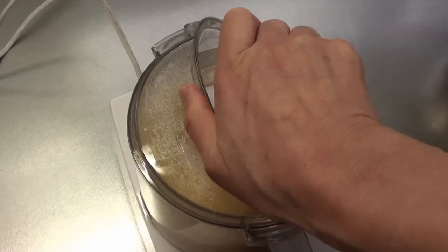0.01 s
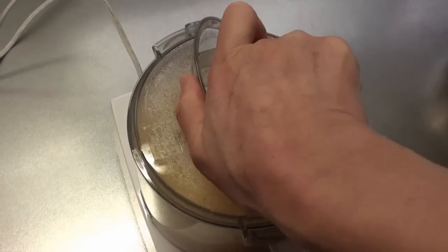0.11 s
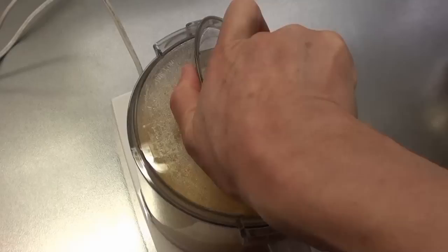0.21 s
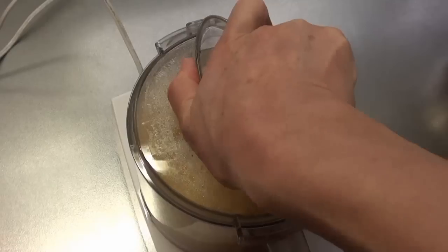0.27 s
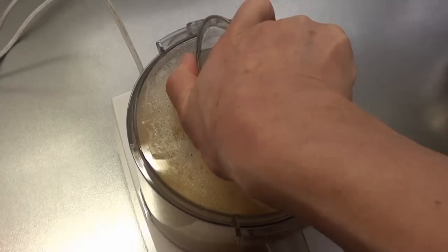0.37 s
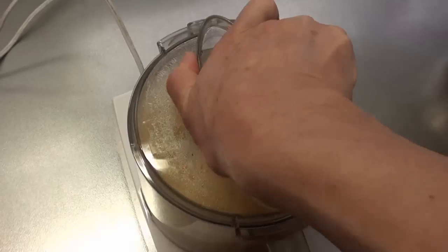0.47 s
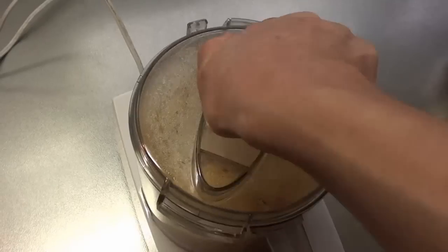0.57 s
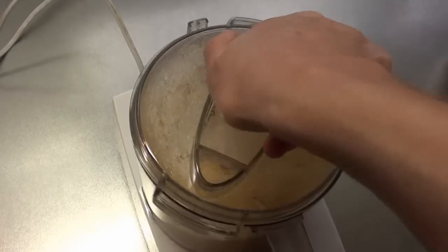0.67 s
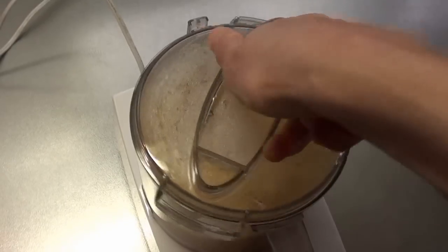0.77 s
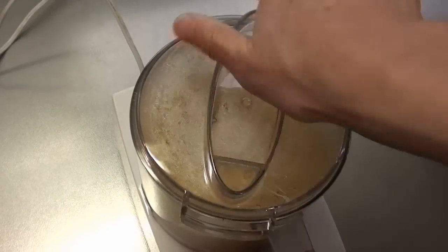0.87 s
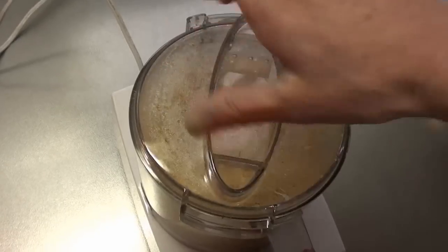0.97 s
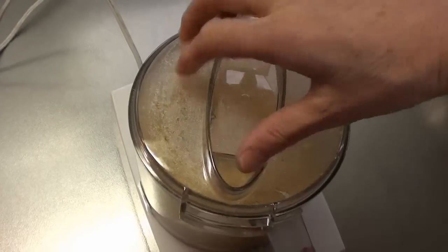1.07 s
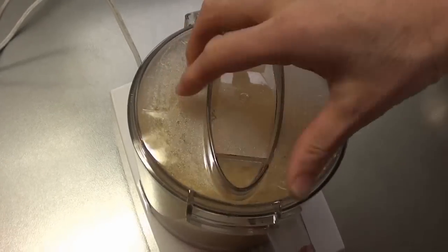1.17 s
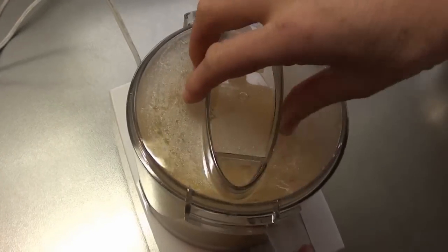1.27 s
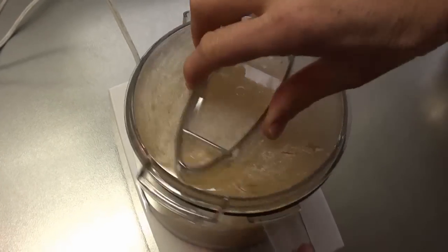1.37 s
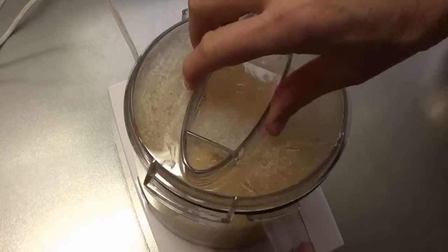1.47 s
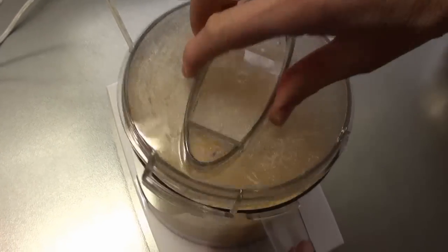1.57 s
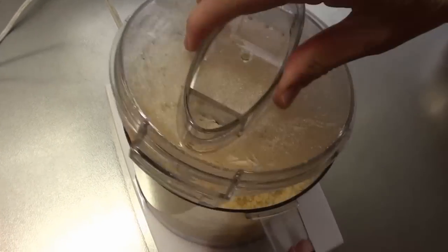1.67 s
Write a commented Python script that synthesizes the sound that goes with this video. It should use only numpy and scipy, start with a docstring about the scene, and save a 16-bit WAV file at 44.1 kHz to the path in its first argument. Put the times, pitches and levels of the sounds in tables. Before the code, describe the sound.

A plastic food processor lid is twisted on its bowl, close up in a small, briefly echoing kitchen. A short rub and light knocks open; latch tabs snap and squeak at about 0.25-0.4 and again at 0.6 seconds. Hard hollow clacks cluster near 0.88, then a quieter gap. Strong knocks land at 1.2 and 1.34, thinning to small taps and rubs by 1.67 over quiet hum and hiss.

```python
"""A hand twists the plastic lid of a food processor bowl to and fro in a small kitchen, over quiet hum and hiss.
It opens on a rub of rim on rim and faint knocks; from a quarter second the latch tabs snap and squeak in two bursts.
Harder knocks follow, then more in the second half, thinning to small ones with short rubs until background is left.
Knocks and snaps are decaying modes plus noise cracks, squeaks are unsteady harmonics, rubs are dense grains;
the short room answers with decaying noise."""
import sys
import numpy as np
from scipy import signal
from scipy.fft import rfft, irfft
from scipy.io import wavfile

SR = 44100
rng = np.random.default_rng(int(sys.argv[2]) if len(sys.argv) > 2 else 0)


def gain_from_decibels(decibels):
    """Convert decibel values to linear amplitude factors."""
    exponent = np.asarray(decibels, float) / 20
    return 10 ** exponent


def transcribe(u):
    """Save the signal u as a 16-bit wav file named by the first command-line argument.

    u: samples, shape (n,) or (channels, n), limited to [-1, 1]; the rate is SR.
    q: integer samples, one column per channel.
    """
    v = np.clip(np.atleast_2d(u).T, -1, 1)
    q = np.round(v * 32767).astype(np.int16)
    wavfile.write(sys.argv[1], SR, q)


N = 77175
LEFT_RIGHT = np.array([[1], [-1]])


def at_hz(points, hz):
    """Straight lines on a log-frequency axis."""
    table = np.array(points)
    return np.interp(np.log(hz + 1e-9), np.log(table[:, 0]), table[:, 1])


def rms_one(x):
    """Scale to unit rms."""
    return x / np.sqrt(np.mean(x ** 2) + 1e-20)


def band(x, low_hz, high_hz):
    """Causal band-pass."""
    return signal.sosfilt(signal.butter(2, [low_hz, high_hz], "band", fs=SR, output="sos"), x)


def drift(hz):
    """Noise through two equal one-pole low-passes: a slow random wander of unit rms."""
    r = np.exp(-2 * np.pi * hz / SR)
    settle = 4000  # samples
    noise = rng.standard_normal(N + settle)
    return rms_one(signal.lfilter([1], [1, -2 * r, r * r], noise)[settle:])


# Onset of a blow: time constant in seconds for each of the four bands, low to high.
RISE_S = [0.006, 0.0004, 0.00013, 0.00021]


def blows(table, modes, bands_hz, crack_db, crack_t60, trim_db):
    """Each blow strikes every mode with its own strength, adds a noise crack, and is levelled band by band."""
    spread_db, spread_pitch = 2.0, 0.015  # blow-to-blow spread of mode level, and of pitch as a share
    out, t = np.zeros(N + SR), np.arange(SR // 5) / SR
    mode_hz, mode_db, t60 = np.transpose(modes)
    decay = gain_from_decibels(-60 * np.outer(1 / t60, t))
    for start, knock, boom, clack, tick in table:
        pitch_chance, level_chance = rng.standard_normal((2, len(mode_hz)))
        noise = rng.standard_normal(len(t))
        turns = np.outer(mode_hz * (1 + spread_pitch * pitch_chance), t)
        strength = gain_from_decibels(mode_db + spread_db * level_chance)
        rings = strength @ (np.sin(2 * np.pi * turns) * decay)
        i = int(start * SR)
        for k, band_db in enumerate([boom, knock, clack, tick]):
            low, high = bands_hz[k:k + 2]
            # white noise raised so that its share inside the band has unit power
            crack = noise * np.sqrt(SR / 2 / (high - low)) * gain_from_decibels(-60 * t / crack_t60[k])
            blow = (rings + gain_from_decibels(crack_db[k]) * crack) * (1 - np.exp(-t / RISE_S[k]))
            blow = band(band(blow, low, high), low / 1.3, high * 1.3)
            first_10_ms = np.sqrt(np.mean(blow[:SR // 100] ** 2))
            out[i:i + len(t)] += gain_from_decibels(band_db + trim_db[k]) * blow / first_10_ms
    return out[:N]


# Lid knocks on the bowl. Each row: start in seconds, then level in dB of knock, boom, clack and tick,
# before the band trim.
KNOCKS = [(0.012, -32, -42, -35.5, -38.5), (0.145, -24.5, -50, -28, -31), (0.196, -21.5, -61, -35, -32),
          (0.203, -16, -26, -26.5, -22), (0.617, -13.5, -22, -12.5, -21), (0.752, -28.5, -26, -33, -41),
          (0.836, -27, -48, -26.5, -27.5), (0.855, -25.5, -47, -37, -31), (0.877, -16, -30, -17, -34.5),
          (0.881, -8, -33, -13, -21.5), (0.897, -16, -27.5, -21.5, -31.5), (0.957, -50, -33.5, -34.5, -56),
          (1.03, -61, -42, -45, -41), (1.058, -37.5, -33.5, -44, -36.5), (1.142, -55, -44.5, -43.5, -48),
          (1.201, -6, -17.5, -22, -37.5), (1.31, -54, -33.5, -42.5, -42), (1.341, -9.5, -18, -18, -34.5),
          (1.348, -16, -24.5, -31, -31.5), (1.425, -16.5, -26, -23, -40), (1.433, -25.5, -30.5, -39, -34.5),
          (1.482, -21, -31.5, -35, -32), (1.505, -30, -47, -42, -57), (1.537, -21.5, -30, -27, -35.5),
          (1.544, -28.5, -33, -52, -54), (1.629, -39, -39, -41, -67), (1.652, -43, -49, -46, -43),
          (1.665, -38, -44, -38.5, -41)]
# Modes of lid and bowl, which ring under the rubs too. Each row: pitch in Hz, level in dB, t60 in seconds.
BODY = [(236.6, -0.5, 0.087), (289, -3.5, 0.056), (346.1, 2, 0.054), (460.5, 1.5, 0.05), (533.5, -2, 0.059),
        (660.6, -7, 0.097), (834, -3, 0.09), (926, 5, 0.017), (1184, 2, 0.017), (1320, 3, 0.026),
        (1585, -5.5, 0.055), (1954, -0.5, 0.056), (2207, 1.5, 0.017), (2602, -2, 0.045), (2924, 1, 0.03),
        (3257, 1.5, 0.017), (3700, 1.5, 0.01), (4366, -4, 0.016), (5060, -12, 0.019)]
# Edges in Hz of the boom, knock, clack and tick bands.
KNOCK_BANDS_HZ = [130, 450, 1500, 4500, 10500]
# Dense small modes, heard as a dying noise: level in dB, then t60 in seconds, for each band from boom to tick.
KNOCK_CRACK_DB = [-14.5, 1, -5.5, 18]
KNOCK_CRACK_T60_S = [0.049, 0.062, 0.093, .02]
# Balance of the bands, boom to tick, in dB.
KNOCK_TRIM_DB = [-7.5, -12.5, -7.5, -7]


def knocks():
    """The lid knocks on the rim and sets the modes of lid and bowl ringing."""
    return blows(KNOCKS, BODY, KNOCK_BANDS_HZ, KNOCK_CRACK_DB, KNOCK_CRACK_T60_S, KNOCK_TRIM_DB)


# Latch tabs snap over the rim. Each row: start in seconds, then level in dB of knock, hollow ring, snap
# and tick, before the band trim.
SNAPS = [(.245, -35, -58, -48, -66), (.262, -28, -39, -37, -57), (.286, -18, -42, -19, -34.5),
         (.318, -27, -33, -17, -52), (.401, -11.5, -22, -12, -24.5), (.584, -20, -42, -19, -21),
         (.597, -13, -38, -13.5, -19), (1.33, -23.5, -54, -37, -44)]
# Modes of the latch. Each row: pitch in Hz, level in dB, t60 in seconds.
LATCH = [(549, 3, .13), (1110, -3, .05), (2280, 1.5, .03), (3300, 1.5, .02), (3740, 3, .022),
         (4200, -1.5, .02), (4820, -6, .025)]
# Edges in Hz of the hollow ring, knock, snap and tick bands.
SNAP_BANDS_HZ = [400, 750, 2600, 4600, 10500]
# Noise crack of a snap: level in dB, then t60 in seconds, for each band from hollow ring to tick.
SNAP_CRACK_DB = [-10, 1.5, 0, 6]
SNAP_CRACK_T60_S = [.05, .04, .02, .025]
# Balance of the bands, hollow ring to tick, in dB.
SNAP_TRIM_DB = [-5, -12, -5, -6]


def snaps():
    """The tabs snap over the rim and set the modes of the latch ringing."""
    return blows(SNAPS, LATCH, SNAP_BANDS_HZ, SNAP_CRACK_DB, SNAP_CRACK_T60_S, SNAP_TRIM_DB)


# Stick-slip squeaks of the latch. Each row: start in seconds, length in seconds, pitch in Hz, level in dB,
# brightness in dB per harmonic.
SQUEAKS = [(0.3162, .013, 1352, -17.5, 1), (0.328, 0.0086, 1338, -17, -1), (.366, 0.054, 1340, -35.5, 1.7),
           (0.579, 0.031, 1358, -20, 0.5), (.6, 0.021, 1340, -25, 4.5), (0.628, 0.031, 1371, -23, 2),
           (0.682, 0.056, 1337, -39.5, -1)]
# Level in dB of each harmonic, fundamental first, before brightness.
SQUEAK_ORDERS_DB = [-7, -2.5, -11, -12, -22.5, -24, -31.5]


def squeaks():
    """A wavering stack of harmonics, each shaken in size and phase, holds while the latch slips and rings out."""
    flutter_hz, wander_share, roughness = 70, 0.007, 0.8
    fall_db_per_s, extra_fall_db_per_s = 1500, 72  # of the fundamental, and added for each higher harmonic
    attack_s = 0.00067
    t, out = np.arange(N) / SR, np.zeros(N)
    wandering_time = np.cumsum(1 + wander_share * drift(flutter_hz)) / SR
    shakes = []
    for k, order_db in enumerate(SQUEAK_ORDERS_DB):
        rate_hz = flutter_hz * np.sqrt(k + 1)
        shake = 1 + roughness * (drift(rate_hz) + 1j * drift(rate_hz))
        shakes.append(gain_from_decibels(order_db) * shake)
    for start, length, hz, db, tilt_db in SQUEAKS:
        shape = np.clip((t - start) / attack_s, 0, 1) * gain_from_decibels(db)
        ringing_s = np.maximum(t - start - length, 0)
        phase = 2 * np.pi * hz * wandering_time
        for k, shake in enumerate(shakes):
            fall_db = ringing_s * (fall_db_per_s + extra_fall_db_per_s * k)
            tone = np.real(shake * np.exp(1j * (k + 1) * phase))
            out += shape * gain_from_decibels(tilt_db * (k - 1) - fall_db) * tone
    return out


# Strokes of rim on rim. Each row: start in seconds, length in seconds, level in dB,
# brightness in dB per octave, fade in dB per second (negative swells).
RUB = [(-.02, 0.055, -22.5, 1.1, 319), (.09, 0.22, -61.5, -6, -57), (0.13, 0.071, -47, -0.5, -100),
       (0.23, .07, -60, -3, 100), (0.406, 0.042, -23.5, 1.1, 275), (0.327, 0.057, -28.5, 2.8, 148),
       (0.591, 0.063, -16.5, 3.5, 66), (0.652, 0.072, -19.5, .3, 202), (0.77, 0.064, -45.5, 8, 148),
       (0.84, 0.033, -26.5, -1, -37), (0.875, 0.023, -16, 0.5, 196), (0.917, 0.044, -27, -1.8, 97),
       (1.055, 0.043, -41.5, 4.5, 141), (1.226, 0.12, -40, -6, 155), (1.33, 0.029, -32.5, 2.5, 24),
       (1.37, 0.057, -48, -13, 100), (1.413, .02, -36.5, 6, -200), (1.43, 0.052, -38, 7, 30),
       (1.437, 0.047, -30, -2, 28), (1.5, 0.018, -51, -9, 32), (1.551, 0.032, -37, -4, 100),
       (1.623, 0.045, -44, -3, 26)]
# Spectrum of the rub before brightness. Each row: frequency in Hz, density in dB per Hz.
RUB_COLOUR = [(35, -45), (60, -4.5), (339, -0.5), (977, 0), (1340, -9.5), (2350, -9), (2690, 1.5),
              (3690, -21.5), (8290, -18.5), (13000, -59.5)]


def rub():
    """Dense grains shake the body's modes and a broad rasp; each stroke has its own strength and colour."""
    grains_per_s, ring_db, edge_s = 5000, -10.5, 0.007
    t = np.arange(N) / SR
    grains = (rng.random(N) < grains_per_s / SR) * rng.choice([-1, 1], N)
    rings = np.zeros(N)
    for mode_hz, mode_db, t60 in BODY:
        r, w = gain_from_decibels(-60 / (t60 * SR)), 2 * np.pi * mode_hz / SR
        ring = signal.lfilter([1], [1, -2 * r * np.cos(w), r * r], grains)
        rings += gain_from_decibels(mode_db) * rms_one(ring)
    raw = rms_one(grains) + gain_from_decibels(ring_db) * rms_one(rings)
    edges = 60 * 2 ** np.arange(0, 8, .5)  # half-octave bands
    hz = np.sqrt(edges[:-1] * edges[1:])
    bands = np.array([rms_one(band(raw, low, high)) for low, high in zip(edges, edges[1:])])
    out = np.zeros(N)
    for start, length, db, tilt_db, fade_db in RUB:
        # sqrt(hz) turns density per Hz into level per band
        colour = gain_from_decibels(at_hz(RUB_COLOUR, hz) + tilt_db * np.log2(hz / 1500)) * np.sqrt(hz)
        rasp = colour @ bands / np.linalg.norm(colour)
        edge = np.clip(np.minimum(t - start, start + length - t) / edge_s + .5, 0, 1)
        out += gain_from_decibels(db - fade_db * np.clip(t - start, 0, length)) * edge * rasp
    return out


# Decay of the kitchen. Each row: frequency in Hz, t60 in seconds.
KITCHEN = [(150, 0.19), (600, 0.24), (2000, 0.24), (5000, 0.26), (11000, 0.45)]


def kitchen(x):
    """Diffuse echoes: octave bands of noise, each dying at its own rate, partly alike left and right."""
    level_db, like, first_echo_s = -7.5, 0.76, 0.0061
    t = np.arange(SR // 2) / SR
    tail = np.zeros((2, len(t)))
    for hz in 60 * 2 ** np.arange(8):
        noise = band(rng.standard_normal((2, len(t))), hz, 2 * hz)
        tail += noise * gain_from_decibels(-60 * t / at_hz(KITCHEN, 1.4 * hz))
    tail /= np.sqrt(np.sum(tail ** 2) / 2)
    # silent until the first echo, full after twice that time
    mid, side = tail * np.clip(t / first_echo_s - 1, 0, 1)
    ears = np.sqrt((1 + like) / 2) * mid + np.sqrt((1 - like) / 2) * side * LEFT_RIGHT
    return gain_from_decibels(level_db) * signal.fftconvolve(x[None], ears)[:, :N]


# Spectrum of the background. Each row: frequency in Hz, density in dB per Hz, before overall levelling.
HUM = [(15, -44), (25, -13.5), (200, 1), (400, 0), (1000, -5), (2500, -8), (5000, -13), (8500, -12.5),
       (13800, -21), (15000, -55)]


def hum():
    """Steady noise coloured as hum and hiss, partly alike left and right."""
    level_db, like = -52, 0.6
    colour = gain_from_decibels(at_hz(HUM, np.arange(N // 2 + 1) * SR / N))
    mid, side = irfft(rfft(rng.standard_normal((2, N))) * colour, N)
    return gain_from_decibels(level_db) * rms_one(np.sqrt(1 + like) * mid + np.sqrt(1 - like) * side * LEFT_RIGHT)


# The two microphone ports hear the lid out of step. Each row: frequency in Hz,
# level in dB of the left-right difference relative to the sum.
OUT_OF_STEP = [(60, -6), (150, -35), (500, -11.5), (2000, -13), (5000, -10.5), (12000, -8)]


def scene():
    """The lid close to the microphones, the room and the background around it."""
    lid = knocks() + snaps() + squeaks() + rub()
    # air and microphone roll off above 9260 Hz; the small bowl radiates little below 112 Hz
    lid = signal.sosfilt(signal.butter(6, 9260, fs=SR, output="sos"), lid)
    lid = signal.sosfilt(signal.butter(2, 112, "high", fs=SR, output="sos"), lid)
    # left minus right in dB: a slight lean to the left, shrinking very slowly
    pan_db = 0.3 - 0.06 * np.arange(N) / SR
    direct = lid * gain_from_decibels(pan_db / 2 * LEFT_RIGHT)
    difference = gain_from_decibels(at_hz(OUT_OF_STEP, np.arange(N // 2 + 1) * SR / N))
    side = irfft(1j * rfft(lid) * difference, N)  # a quarter turn out of phase
    return direct + side * LEFT_RIGHT + kitchen(lid) + hum()


def top_cut(x):
    """Nothing passes above the cut-off."""
    return signal.sosfilt(signal.butter(12, 15250, fs=SR, output="sos"), x)


# Colour of the two microphones. Each row: frequency in Hz, left minus right in dB.
LEAN = [(60, -0.5), (240, -1.5), (940, -0.5), (3710, 0.0), (14600, -0.5)]


def record(dry):
    """The two microphones differ a little in colour, and everything above 15250 Hz is cut."""
    hz = np.arange(N // 2 + 1) * SR / N
    response = gain_from_decibels(at_hz(LEAN, hz) / 2 * LEFT_RIGHT) * (hz < 15250)
    mix = irfft(rfft(dry) * response, N)
    return top_cut(mix)


dry = scene()
out = record(dry)
transcribe(out)
```